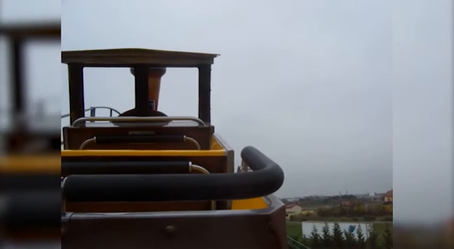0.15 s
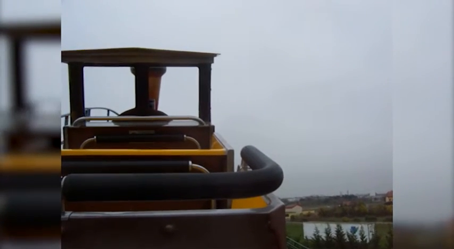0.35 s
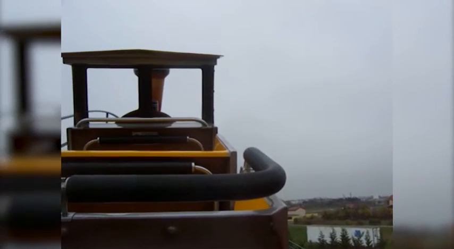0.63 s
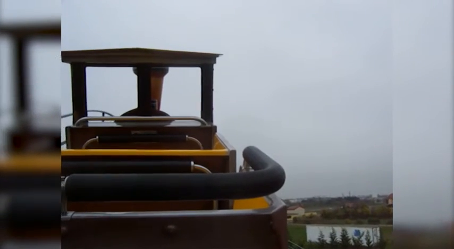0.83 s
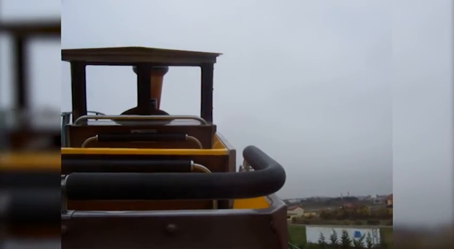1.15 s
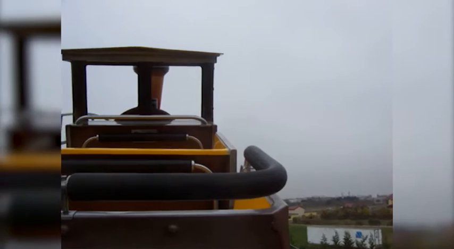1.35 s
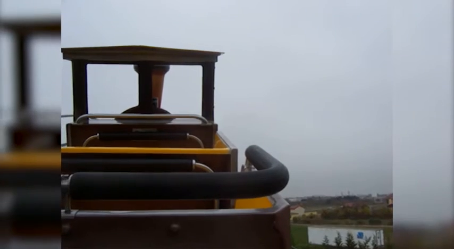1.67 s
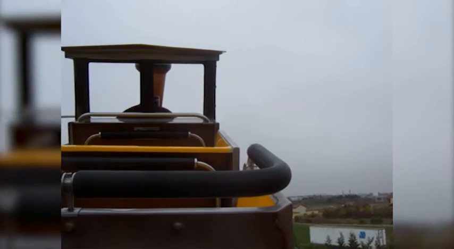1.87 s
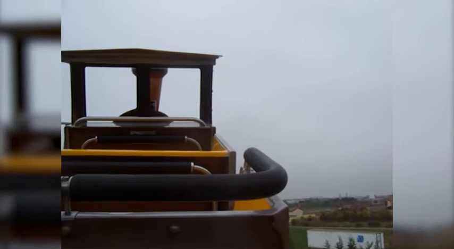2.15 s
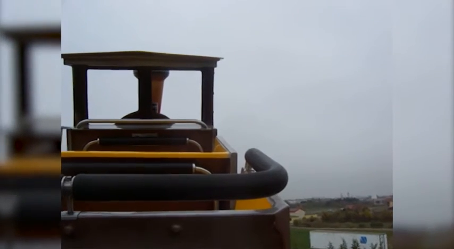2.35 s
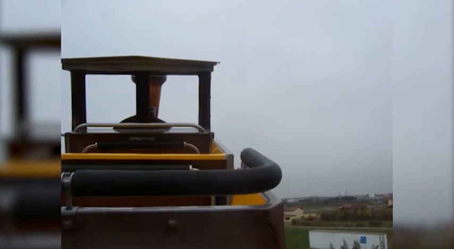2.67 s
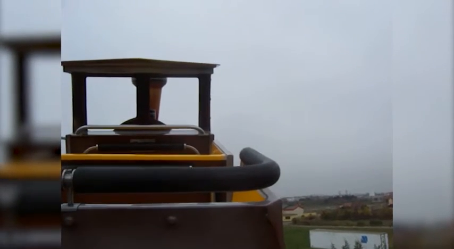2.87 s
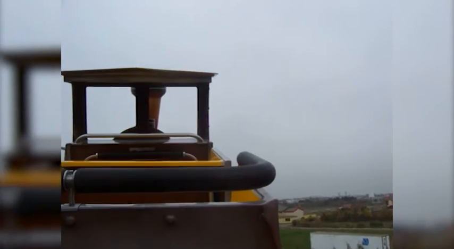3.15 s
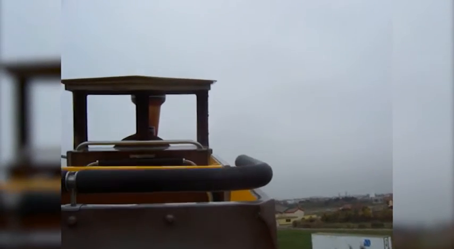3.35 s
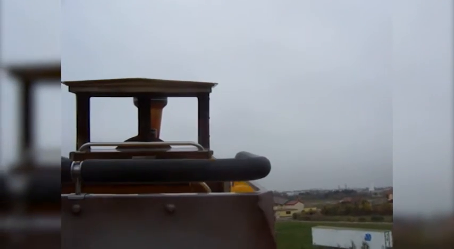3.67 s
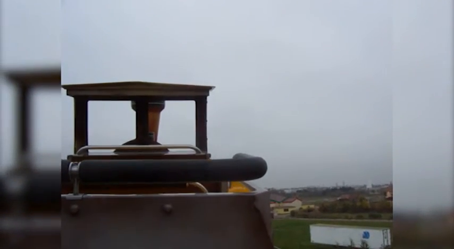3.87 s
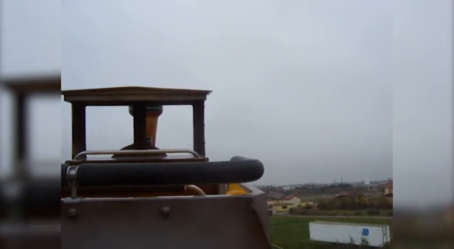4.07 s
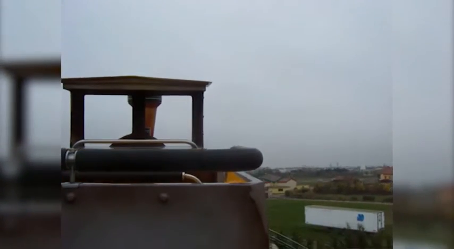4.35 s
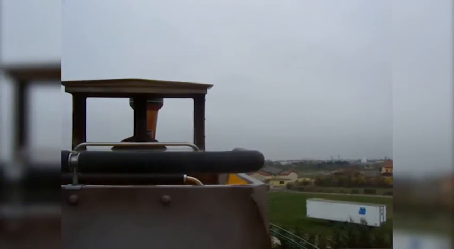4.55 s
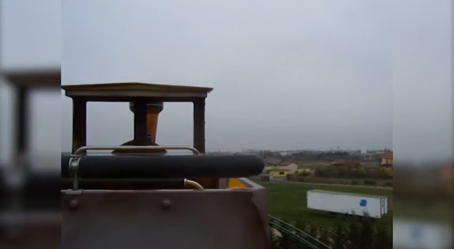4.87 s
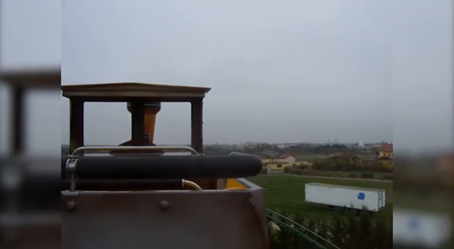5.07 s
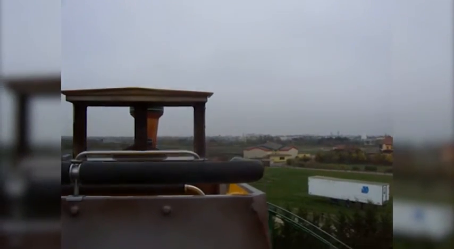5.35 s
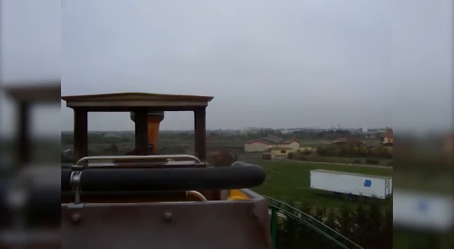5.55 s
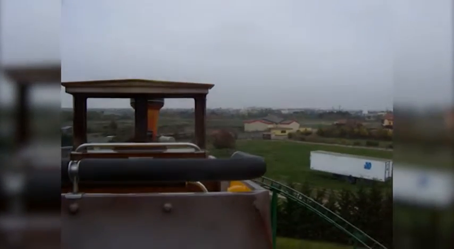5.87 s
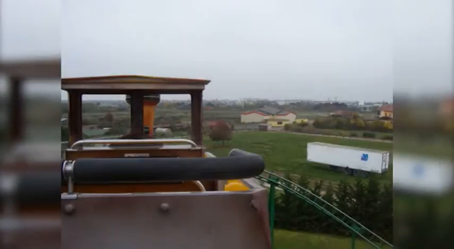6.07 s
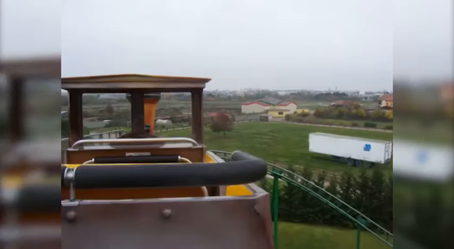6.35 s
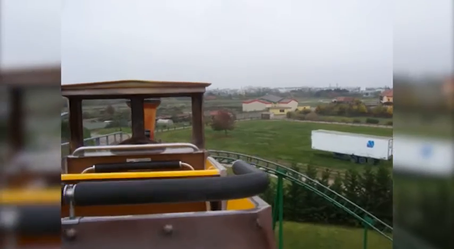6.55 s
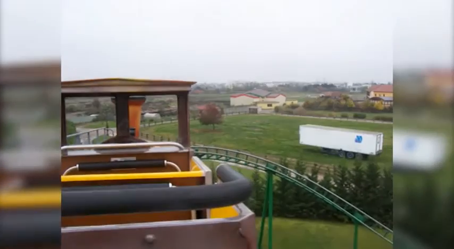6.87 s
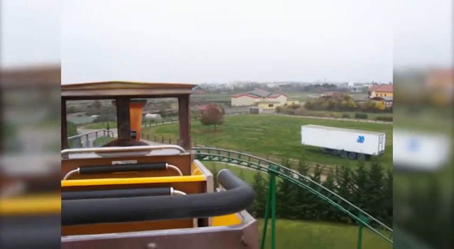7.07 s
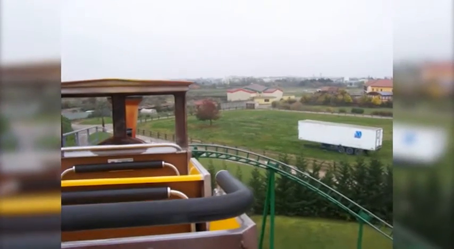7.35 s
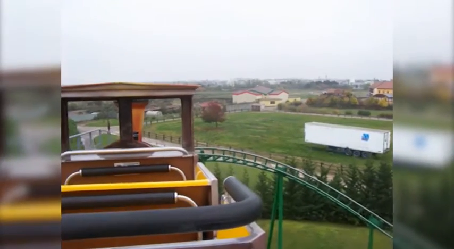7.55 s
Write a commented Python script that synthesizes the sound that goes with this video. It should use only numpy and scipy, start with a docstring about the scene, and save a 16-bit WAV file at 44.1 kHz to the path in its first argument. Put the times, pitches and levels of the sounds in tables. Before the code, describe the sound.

From a coaster seat in the open air, close and without echo. From 0 to 3 s, a deep uneven wheel rumble and wavering low drive hum with faint gear whine lie under a fast metallic chain knock, about twelve per second, alternate links harder. Rough ratchet clacks fall roughly every 0.2 s at first, with some gaps, and dull jolts shake the car. A sharp dry snap comes at 2.8 s, then a tight run of steel clanks, thuds and bright ringing from 2.95 to 3.25 s. The level falls abruptly; from 3.4 to 4.9 s only faint chain knocks, weak clacks, tiny ticks and soft rumble remain. From 5 s rumble, roar and hiss gradually swell, with a small clank at 5.9 s. After 6.4 s chain clinks turn brighter, a light clank sounds at 7.05 s, and thin flange scraping and jolts join the loud rolling until 7.7 s.

```python
"""From the start the wheels rumble and the lift drive hums under a knocking chain and clacking dogs,
heard from a microphone in a roller coaster seat, all close by in the open air.
The chain hauls the train over its lift hill: links knock about twelve times a second, struck resonances.
Anti-rollback dogs clack over the rack in noise bursts and drop off its end with ringing clanks.
The car goes quiet on the crest, then the shaped-noise rumble, roar and hiss of its wheels swell."""
import sys
import numpy as np
from scipy import signal
from scipy.fft import irfft, next_fast_len
from scipy.io import wavfile
from scipy.ndimage import uniform_filter1d

SR = 44100
rng = np.random.default_rng(int(sys.argv[2]) if len(sys.argv) > 2 else 0)


def persist_wave(psi):
    """Save psi, clipped to +-1, as 16-bit WAV."""
    counts = np.round(np.clip(psi, -1, 1) * 32767).astype(np.int16)
    wavfile.write(sys.argv[1], SR, np.atleast_2d(counts).T)


N = 340011
TIME = np.arange(N) / SR

# Levels in all tables are relative: each source trims its own before the mix.


def from_db(db):
    """Decibels to amplitude gain."""
    return np.exp(np.asarray(db) * np.log(10) / 20)


def rms_one(x):
    """Scale to unit power."""
    return x * (1 / np.sqrt(np.einsum("i,i", x, x) / len(x) + 1e-20))


def steadied(x, seconds):
    """Even out the level over the given time, keeping finer detail."""
    power = uniform_filter1d(x * x, max(int(seconds * SR), 2))
    return x / np.sqrt(np.abs(power) + 1e-12)


def gains(rows):
    """Each level column of a timed table as a gain per sample."""
    times, *columns = np.transpose(rows)
    return [from_db(np.interp(TIME, times, column)) for column in columns]


def noise(colour):
    """Steady unit-power noise with spectrum (frequency [Hz], level [dB]), steep past its ends."""
    hz, db = np.transpose(colour)
    size = next_fast_len(N, True)
    f = (np.arange(size // 2) + .5) * SR / size
    ends = (np.minimum(f / hz[0], 1) * np.minimum(hz[-1] / f, 1)) ** 2
    bins = rng.standard_normal(2 * len(f)).view(complex)
    spectrum = from_db(np.interp(np.log(f), np.log(hz), db)) * ends ** 2
    return rms_one(irfft(bins * spectrum, size)[:N])


def chatter(per_s):
    """Dense tiny contacts of loose steel parts: sparse random impulses at unit power."""
    return rms_one(rng.standard_normal(N) * (rng.random(N) < per_s / SR))


def blows(times, db, rise_s, fade_s):
    """Force of a series of blows: each builds up linearly, then dies away exponentially."""
    out = np.zeros(N)
    for start, gain, fade in zip(times, from_db(db), np.broadcast_to(fade_s, len(times))):
        i = max(int(start * SR), 0)
        span = int((rise_s + 10 * fade) * SR)
        age = TIME[:len(out[i:i + span])]
        rise = np.minimum(age / rise_s, 1)
        out[i:i + len(age)] += gain * rise * np.exp(-np.maximum(age - rise_s, 0) / fade)
    return out


def section(hz, width_hz):
    """Two-pole filter section of one resonance, with a gain of about 1 on top."""
    r = np.exp(-np.pi * width_hz / SR)
    gain = (1 - r * r) / 2
    return [gain, 0, -gain, 1, -2 * r * np.cos(2 * np.pi * hz / SR), r * r]


def resonate(x, hz, width_hz):
    """One resonance driven by x."""
    return signal.sosfilt([section(hz, width_hz)], x)


def narrow(x, hz, width_hz):
    """A resonance applied twice, for steep skirts; unit power."""
    return rms_one(signal.sosfilt([section(hz, width_hz)] * 2, x))


def body(x, modes):
    """Resonances in parallel, signs alternating."""
    force = x + 1e-12 * rng.random(N)  # a trace of noise keeps the filters from stalling at zero
    out = 0
    for k, (hz, width_hz, db) in enumerate(modes):
        out = out + (-1) ** k * from_db(db) * resonate(force, hz, width_hz)
    return out


def wavering(lines):
    """Sine tones whose pitch wanders by about their width."""
    knots = np.arange(0, N / SR + 1, .03)
    out = 0
    for hz, width_hz, db in lines:
        pitch = np.interp(TIME, knots, hz + width_hz / 2 * rng.standard_normal(len(knots)))
        phase = 2 * np.pi * (np.cumsum(pitch) / SR + rng.random())
        out = out + from_db(db) * np.sqrt(2) * np.sin(phase.astype(np.float32))
    return out


# the ride, easing on the crest and swelling after it:
# (time [s], car rumble level [dB], track roar level [dB], wheel hiss level [dB])
RIDE_LEVELS = [(0, -19.5, -35.5, -48), (.65, -19, -34, -48.5), (1.15, -23, -39, -50),
               (1.55, -20, -37, -51.5), (1.75, -23, -42.5, -55), (2.35, -23, -38, -51),
               (3.09, -25.5, -38.5, -52.5), (3.18, -36.5, -48, -66), (3.4, -40, -53, -67.5),
               (4.3, -42, -54, -68.5), (5.05, -36.5, -49.5, -64), (5.45, -33, -45.5, -58),
               (5.85, -30.5, -44, -55.5), (6.5, -25.5, -36.5, -50), (6.85, -29, -36.5, -49.5),
               (7.1, -23, -34, -45.5), (7.71, -23, -31, -43)]
# jolts of the car: (time [s], thump level [dB])
CAR_JOLTS = [(.41, -15.5), (1.03, -17), (1.24, -17.5), (1.46, -17.5), (1.61, -24), (1.87, -16), (2.71, -20),
             (2.945, -16.5), (3.055, -15), (4.41, -33), (4.555, -36), (4.965, -31), (5.18, -34),
             (5.655, -36), (7.32, -21), (7.655, -17)]
# panels of the car: (frequency [Hz], width [Hz], level [dB])
CAR_PANELS = [(32.8, 6.9, -6), (68.8, 8.4, -1), (87.7, 12, 0.5), (104, 19.5, 0.5), (123.3, 18, -8.5),
              (205.7, 11.2, -7), (242.3, 21.2, -8.5)]
# spectra of the car body, the rails and the treads: (frequency [Hz], level [dB])
CAR_SPECTRUM = [(11, -24), (18, -0.5), (108, -0.5), (156, -2.5), (217, -12), (302, -11), (420, -18.5),
                (550, -59), (920, -120)]
ROAR_SPECTRUM = [(200, -3), (320, 2.5), (420, 2), (520, 4), (620, 5), (800, 3), (1100, -3), (1500, -2),
                 (2200, -7), (3200, -25.5), (5000, -35)]
HISS_SPECTRUM = [(1500, -22.5), (2600, 4), (3800, 2), (5000, 1.5), (6400, -2), (7500, -7), (9000, -14.5),
                 (10000, -23.5), (11000, -46.5)]


def wheels():
    """Uneven track shakes the car's panels and now and then jolts them; rails roar, treads hiss."""
    rumble, roar, hiss = gains(RIDE_LEVELS)
    times, jolt_db = np.transpose(CAR_JOLTS)
    lurch = from_db(1.36 * noise([(4, 3), (12, -2.5), (25, -12.5)]))
    jolts = blows(times, jolt_db, rise_s=0.017, fade_s=0.036)
    shaking = np.hypot(rumble * lurch, jolts)
    panels = rms_one(body(rng.standard_normal(N), CAR_PANELS))
    shake = panels + from_db(-1.5) * noise(CAR_SPECTRUM)
    flutter = from_db(1.67 * noise([(5, 3), (30, -3.0), (120, -28.5)]))
    rails = from_db(-2.5) * roar * noise(ROAR_SPECTRUM)
    treads = from_db(-0.08) * hiss * noise(HISS_SPECTRUM)
    return from_db(-2.0) * shaking * steadied(shake, 0.097) + flutter * (rails + treads)


# light steady flange rubbing, harder in the curve after the crest:
# (time [s], level against the wheel hiss curve [dB])
FLANGE_RUBBING = [(0, -11.5), (3.2, -9), (3.6, -15), (5.2, -15), (6.8, -6.5), (7.1, -6), (7.71, -1)]
# a wheel flange scuffs the rail: (time [s], peak level [dB], fade [s])
FLANGE_SCUFFS = [(.34, -45, 0.058), (3.62, -67, 0.087), (5.36, -56, .08), (5.5, -58, .08),
                 (6.94, -44.5, 0.075)]
# thin airy ring of the rubbed steel: (frequency [Hz], width of one filter pass [Hz], level [dB])
FLANGE_MODES = [(5120, 360, -1.5), (5900, 150, -4.5), (6340, 180, -1.5), (6650, 260, -2.5),
                (7210, 220, -3.5), (7900, 470, -8), (8430, 400, -9.5), (9460, 430, -14)]


def flanges():
    """Steel rubs on steel in fits and starts: unsteady pressure on dense contacts that ring thinly."""
    *_, hiss = gains(RIDE_LEVELS)
    pressure, = gains(FLANGE_RUBBING)
    times, peak_db, fade_s = np.transpose(FLANGE_SCUFFS)
    scuff = hiss * pressure + blows(times, peak_db, rise_s=0.046, fade_s=fade_s)
    grip = from_db(4.45 * noise([(8, 5), (40, -6.5), (150, -14.0)]))
    contacts = chatter(6000)
    ring = sum(from_db(db) * narrow(contacts, hz, width_hz) for hz, width_hz, db in FLANGE_MODES)
    return from_db(-3.5) * scuff * grip * rms_one(ring)


# lift drive: (time [s], hum level [dB], lower whine level [dB], upper whine level [dB])
DRIVE_LEVELS = [(0, -29.5, -38, -34.5), (1, -25.5, -41, -39.5), (1.8, -33, -44, -43),
                (2.95, -28.5, -40.5, -39.5), (3.4, -51.5, -58, -62), (4.2, -43.5, -58, -53.5),
                (5.5, -38, -49, -46.5), (6.6, -34.5, -46.5, -38.5), (6.9, -32, -37, -45),
                (7.71, -26, -44, -42)]
# tones of the hum and of the gearing: (mean frequency [Hz], width of wander [Hz], level [dB])
HUM_TONES = [(33.1, 3.5, -5), (63.4, 5.6, -14.5), (117, 7.25, -0.5), (179.6, 2.4, -6.5), (208.7, 2.7, -3.5),
             (222.9, 1.7, -6)]
LOWER_WHINE_TONES = [(330, 6.1, -7.5), (449, 2.93, -0.5)]
UPPER_WHINE_TONES = [(675.3, 9.08, 0.0027)]


def drive():
    """The lift drive hums through the track and its gearing whines, throbbing with the load."""
    hum, lower, upper = gains(DRIVE_LEVELS)
    load = from_db(1.05 * noise([(3, 2), (14, 2), (40, -5.5)]))
    whine = lower * wavering(LOWER_WHINE_TONES) + upper * wavering(UPPER_WHINE_TONES)
    return load * (from_db(-2.5) * hum * wavering(HUM_TONES) + from_db(-5.0) * whine)


# dogs slapping over the rack teeth: (time [s], level [dB], fade of the slap [s])
DOG_SLAPS = [(0.001, -29.5, 0.011), (0.215, -33, 0.02), (0.624, -27.5, 0.012), (0.828, -30, 0.019),
             (1.032, -30, 0.015), (1.236, -33, 0.011), (1.452, -34, 0.015), (1.868, -39.5, 0.03),
             (2.264, -29.5, 0.019), (2.484, -29.5, 0.017), (2.693, -30, 0.025), (2.895, -35.5, 0.022),
             (3.312, -53, 0.035), (3.922, -47.5, 0.019), (4.133, -50.5, 0.026), (4.546, -48.5, .018),
             (4.758, -49.5, 0.015), (5.381, -44.5, 0.022), (7.467, -38.5, 0.015)]
# spectrum of the slap: (frequency [Hz], level [dB])
SLAP_SPECTRUM = [(300, 1), (700, 10), (1300, 12.5), (2100, 0), (2800, 0), (4000, 2.5), (5200, -3),
                 (6500, -7), (8500, -12.5), (11000, -35.5)]
# the rack under a dog: (frequency [Hz], width [Hz], level [dB])
RACK_RESONANCES = [(639, 31, 9), (811, 29, 9.5), (1172, 16, 7.5), (1245, 16, 1.5), (1430, 16, 2.5),
                   (1907, 33, 3.5), (2086, 170, -3.5), (2490, 28, -1.5), (2660, 78, -4.5), (3100, 63, -6),
                   (3530, 91, -8), (3900, 31, -3), (4110, 43, -10.5), (4170, 90, -6), (6540, 52, -18)]


def dogs():
    """A dog slaps off a tooth in a short rough burst that rings the rack and bumps the floor."""
    times, db, fade_s = np.transpose(DOG_SLAPS)
    grain = 1 + 0.29 * noise([(60, -10.0), (500, 1)])
    slap = blows(times, db + 4.5, rise_s=0.0053, fade_s=fade_s) * grain * noise(SLAP_SPECTRUM)
    rack_force = blows(times, db + 18.5, rise_s=0.0068, fade_s=0.014) * chatter(5000)
    rack = body(rack_force, RACK_RESONANCES)
    floor = steadied(noise([(200, 2), (340, 4.5), (480, -7), (600, -17.0)]), 0.026)
    bump = blows(times + 0.0034, db - 0.5, rise_s=0.0099, fade_s=0.041) * floor
    return slap + rack + bump


# the chain runs almost evenly, gaining a little speed as its load eases
FIRST_LINK_S, LINKS_PER_S, SPEED_UP_PER_S2 = .046, 12.256, .0419


def link_times():
    """The moments at which the links seat, under constant slight acceleration."""
    k = np.arange(LINKS_PER_S * N / SR + 10)
    speed = np.sqrt(LINKS_PER_S ** 2 + 2 * SPEED_UP_PER_S2 * k)
    times = FIRST_LINK_S + (speed - LINKS_PER_S) / SPEED_UP_PER_S2
    return times[times < N / SR]


# every second link lands harder; chance adds a little in strength and time
ALTERNATE_DB, LINK_SCATTER_DB, LINK_JITTER_S = 1.5, 1.2, 0.001
# how hard the links sound at the seat:
# (time [s], knock level [dB], clink level [dB], ting level [dB])
CHAIN_LEVELS = [(0, -35, -35.5, -52), (.6, -30, -34.5, -48.5), (1.55, -31, -36, -50),
                (1.75, -35.5, -40, -54), (3.08, -35.5, -34.5, -48), (3.2, -48.5, -52.5, -64),
                (4.15, -52, -51.5, -64), (4.95, -45, -45, -60), (5.5, -42, -40, -53),
                (6.1, -40, -38.5, -50), (6.4, -40.5, -35.5, -39.5), (6.85, -43.5, -34, -44.5),
                (7.05, -36.5, -29, -39), (7.71, -32, -30, -38)]
# some links slam home, and one seats softly:
# (time [s], extra knock level [dB], extra clink and ting level [dB])
UNEVEN_LINKS = [(.456, 2, 3.5), (.536, 4.5, 4), (.778, 4, -4), (.94, 3.5, 0), (1.429, 5.5, 0.5),
                (1.59, 2.5, 6.5), (2.402, 7, 0), (3.856, 6, 0), (4.339, 4, 4.5), (4.498, 5, -1),
                (4.66, 5, -0.5), (5.142, 6.5, -3), (5.461, 6, 2.5), (6.182, 3, 5), (6.268, -11, -11),
                (7.059, 2.5, 1), (7.297, 5, 2), (7.453, 2.5, 2), (7.612, 4, 8)]


def links():
    """Time of each link and the strengths of its knock, clink and ting."""
    times = link_times()
    chance = rng.standard_normal((4, len(times)))
    at, *curves = np.transpose(CHAIN_LEVELS)
    levels = np.array([np.interp(times, at, curve) for curve in curves])
    for when, knock, ring in UNEVEN_LINKS:
        levels += np.outer([knock, ring, ring], np.abs(times - when) < .5 / LINKS_PER_S)
    knock_db, clink_db, ting_db = levels + LINK_SCATTER_DB * chance[1:]
    knock_db = knock_db - ALTERNATE_DB * (-1) ** np.arange(len(times))
    return times + LINK_JITTER_S * chance[0], knock_db, clink_db, ting_db


# the trough's knock, the links' clink and the rollers' ting:
# (frequency [Hz], width of one filter pass [Hz], level [dB])
TROUGH_KNOCK = [(596, 50, -5), (682.4, 36, 1), (799, 67, -0.5), (927, 91, -2.5)]
LINK_CLINK = [(1138, 133, -6.5), (1243, 51, -7), (1350.4, 71, 1.5), (1485, 64, -6), (1696, 69, -3.5),
              (1930, 64, -12.5), (2097, 140, -11)]
ROLLER_TING = [(2443, 230, 4), (2564, 52, 1), (2740, 110, -1.5), (3130, 210, 2), (3550, 110, -10),
               (3590, 33, -15.5), (4050, 70, -10.5)]


def chain():
    """Each link knocks, its roller chatters a moment later, and it settles with a weaker second knock."""
    times, knock_db, clink_db, ting_db = links()
    knock = blows(times, knock_db + 4, rise_s=.0015, fade_s=0.021)
    knock += blows(times + .033, knock_db - 9, rise_s=0.0098, fade_s=0.0031)  # settling
    clink = blows(times + 0.0011, clink_db + 1.5, rise_s=0.0027, fade_s=0.01)
    clink += blows(times + 0.012, clink_db - 4, rise_s=0.0061, fade_s=0.0072)
    ting = blows(times + .001, ting_db + 3.5, rise_s=0.0032, fade_s=0.014)
    link, contacts = np.searchsorted(times, TIME), chatter(3000)

    def rings(modes):
        """Every link lands differently and favours other modes."""
        variety_db = 1.5 * rng.standard_normal((len(times) + 1, len(modes)))
        strengths = from_db(variety_db)
        out = 0
        for k, (hz, width_hz, db) in enumerate(modes):
            out = out + from_db(db) * strengths[link, k] * narrow(contacts, hz, width_hz)
        return steadied(out, 0.0051)

    grit = from_db(-15.5) * noise([(330, 12.5), (1800, -7.0), (3500, -9.0), (8000, -17.5)])
    return knock * (rings(TROUGH_KNOCK) + grit) + clink * rings(LINK_CLINK) + ting * rings(ROLLER_TING)


# small dry ticks: (time [s], level [dB])
DRY_TICKS = [(1.623, -16), (2.7928, 6), (3.878, -27), (4.185, -28), (4.2882, -21.5), (4.344, -28),
             (5.308, -23)]


def ticks():
    """Single sharp snaps with no ring: one-sample impulses through a gentle low-pass."""
    out = np.zeros(N)
    for when, db in DRY_TICKS:
        out[int(when * SR)] = -from_db(db + 4)
    return signal.sosfilt(signal.butter(2, 4200, fs=SR, output="sos"), out + 1e-18)


# hard steel-on-steel blows: (time [s], crack level [dB], bright ping level [dB],
# long ring level [dB], thud level [dB])
STEEL_BLOWS = [(2.958, -19, -41, -36.5, -16), (3.049, -23, -48, -39, -23.5), (3.116, -21, -21, -39.5, -42),
               (3.235, -28, -28.5, -42, -35), (5.932, -36.5, -39, -58, -66), (7.062, -37, -35, -58, -50)]
# spectrum of the crack: (frequency [Hz], level [dB])
CRACK_SPECTRUM = [(200, 9), (500, -14), (1000, -2), (2100, -1.5), (2900, -6.5), (3900, 0), (5000, -6),
                  (7000, -10), (9000, -18.5), (11000, -44)]
# long ring of hard-struck steel: (frequency [Hz], level [dB], time to fall 60 dB [s])
STEEL_RING = [(774, -7.5, 0.38), (918, 8, 0.085), (1260, -0.5, 0.48), (1690, -15, .2), (2080, -14, .22),
              (2350, 1.5, 0.18), (2920, -12, 0.4), (3200, -6, 0.13), (3560, 3.5, 0.16), (3639, -4, 0.16),
              (3940, -5, 0.38), (4020, -13, .25), (4480, -9, 0.13), (5200, -1, 0.14), (5830, -4, 0.15),
              (6600, -10, .15)]


def clanks():
    """A crack and a bright ping, then the steel rings on, loose parts rattle and the car body thuds."""
    times, crack_db, ping_db, ring_db, thud_db = np.transpose(STEEL_BLOWS)
    contacts = chatter(8000)
    crack = blows(times, crack_db + 3.5, rise_s=0.002, fade_s=.011) * noise(CRACK_SPECTRUM)
    bright = narrow(contacts, 6340, 450) + from_db(-16.0) * narrow(contacts, 9580, 500)
    ping = blows(times, ping_db, rise_s=0.0026, fade_s=0.009) * steadied(bright, 0.0081)
    ring = 0
    for hz, db, t60 in STEEL_RING:
        decay = blows(times, ring_db + db - 4.5, rise_s=.002, fade_s=t60 / np.log(1000))
        ring = ring + decay * steadied(narrow(contacts, hz, hz / 110), 0.012)
    loose_parts = noise([(900, -7), (2200, 7.0), (2900, -3.5), (3700, 9.5), (4500, -1.0),
                         (5100, -13), (5900, 1.5), (9500, -21)])
    rattle = blows(times + 0.0054, thud_db - 10, rise_s=0.0046, fade_s=0.045) * loose_parts
    car_body = steadied(resonate(contacts, 97, 60), 0.0172)
    thud = blows(times, thud_db - 6.0, rise_s=0.0054, fade_s=0.032) * car_body
    return crack + ping + ring + rattle + thud


def scene():
    """Everything is close by and in the open air, summed with no echo."""
    return (wheels() + flanges() + drive() + dogs() + chain() + ticks() + clanks())[None]


def record(dry):
    """At the microphone the top rolls off above 9.8 kHz and is cut steeply above 10.7 kHz."""
    dulled = signal.sosfilt(signal.butter(6, 9800, fs=SR, output="sos"), dry)
    return signal.sosfilt(signal.cheby1(12, .2, 10700, fs=SR, output="sos"), dulled)


dry = scene()
out = record(dry)
persist_wave(out)
```